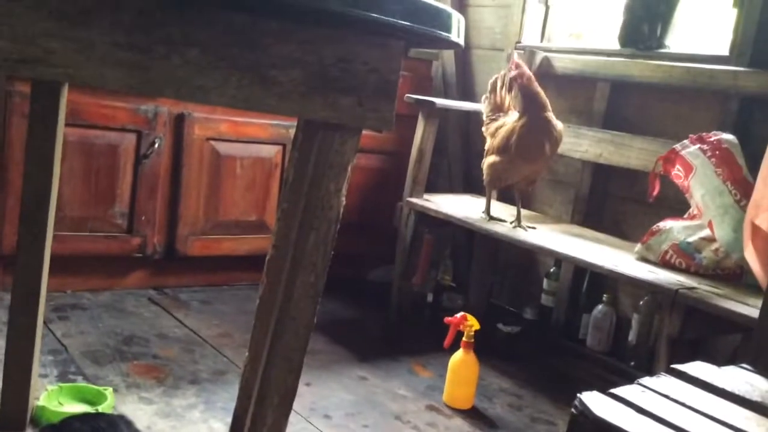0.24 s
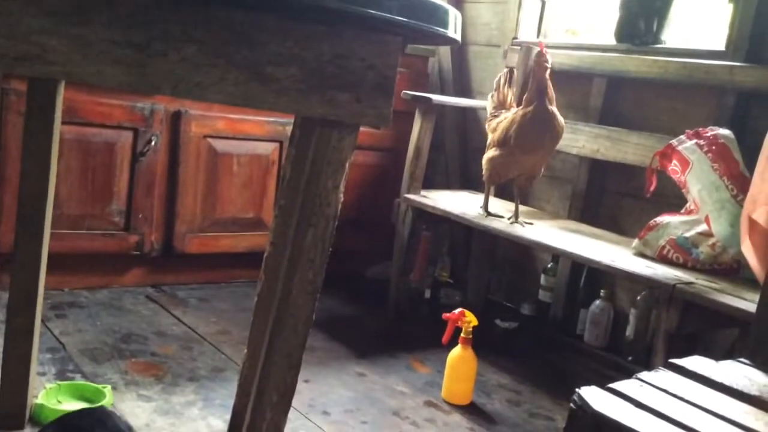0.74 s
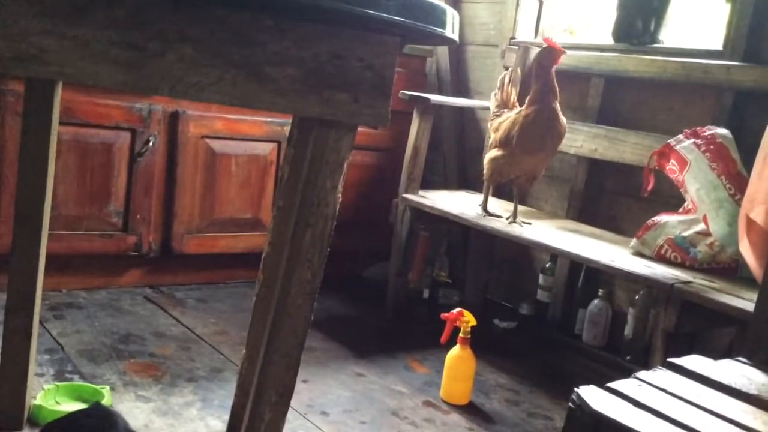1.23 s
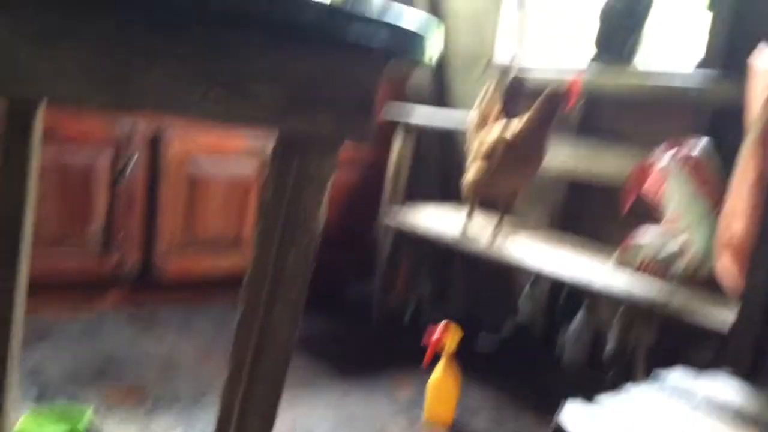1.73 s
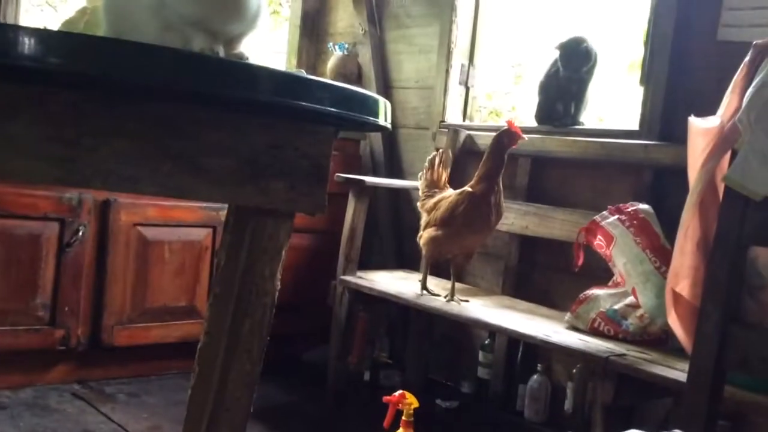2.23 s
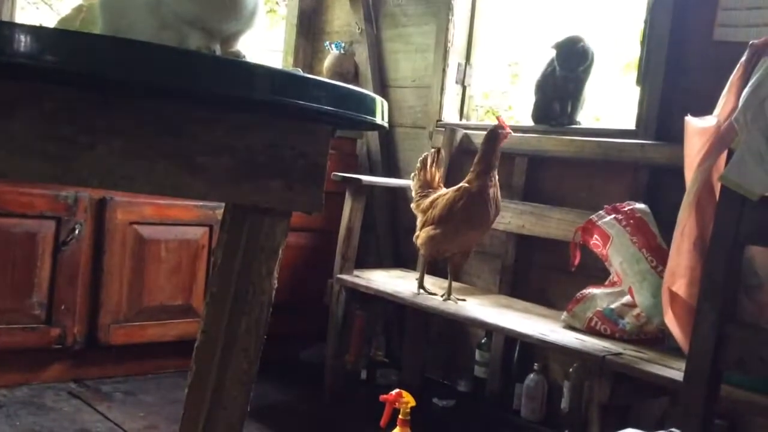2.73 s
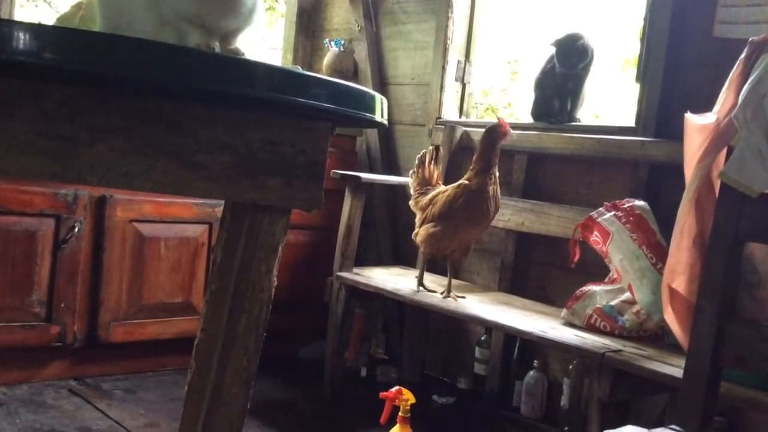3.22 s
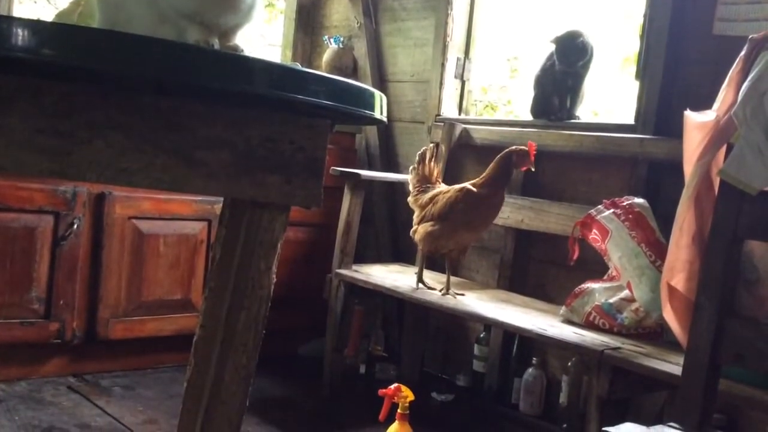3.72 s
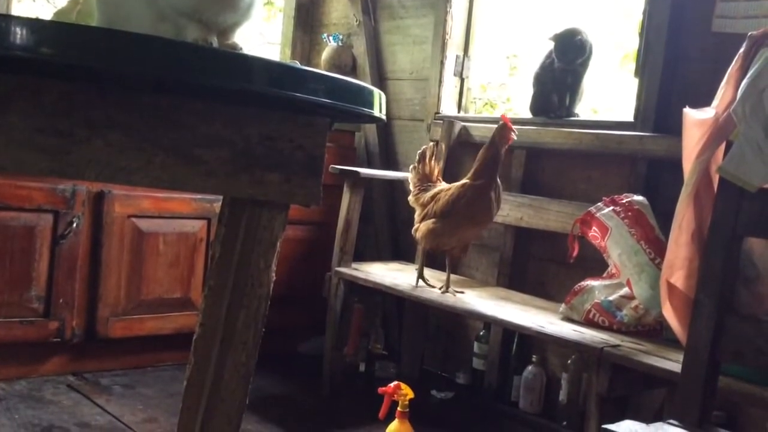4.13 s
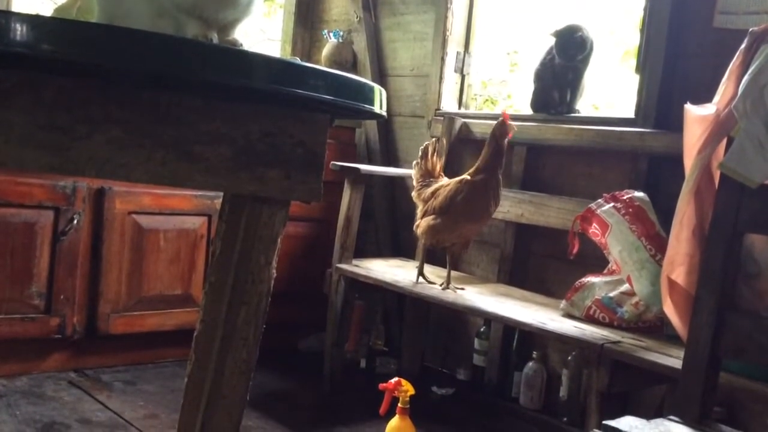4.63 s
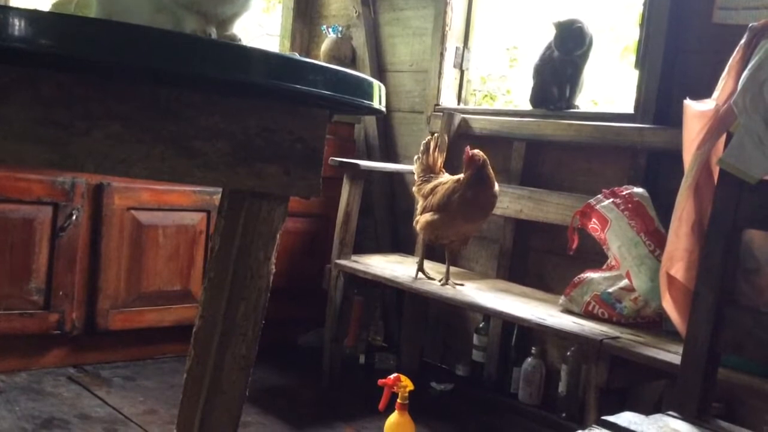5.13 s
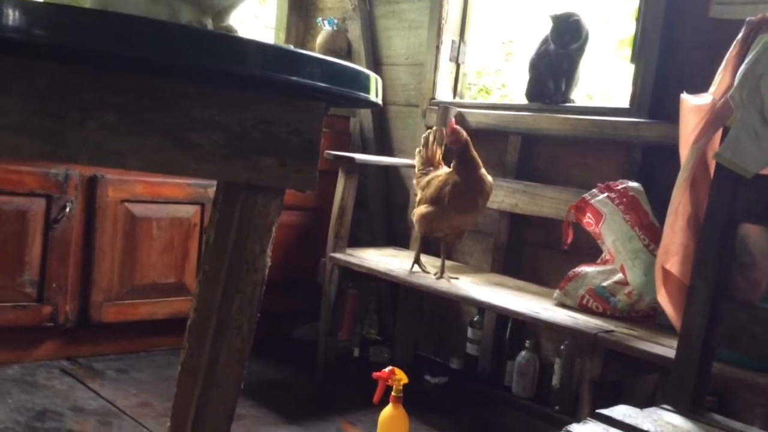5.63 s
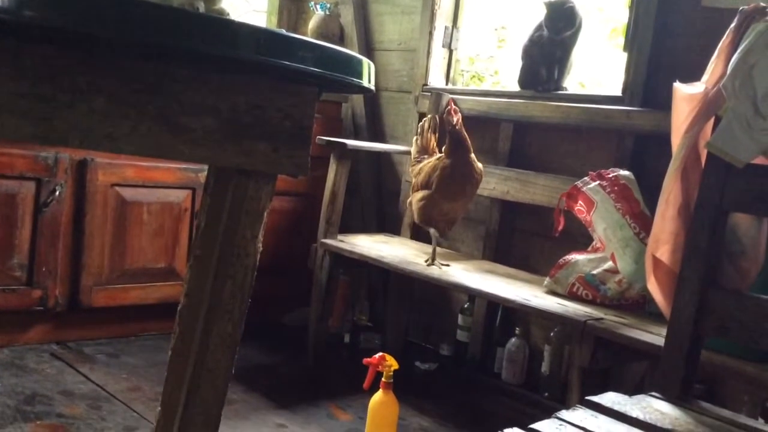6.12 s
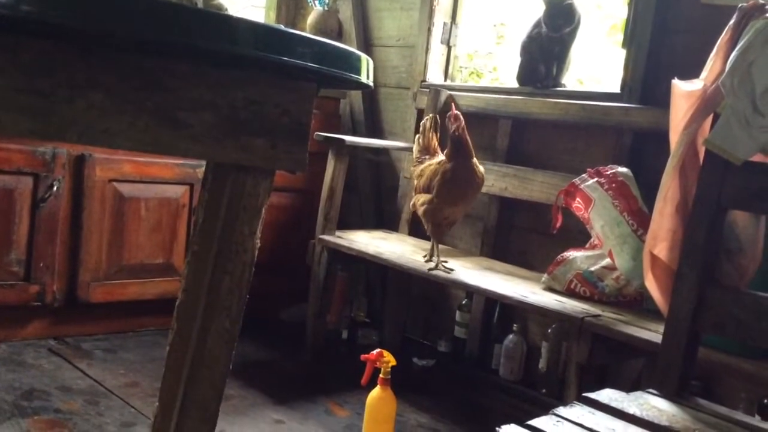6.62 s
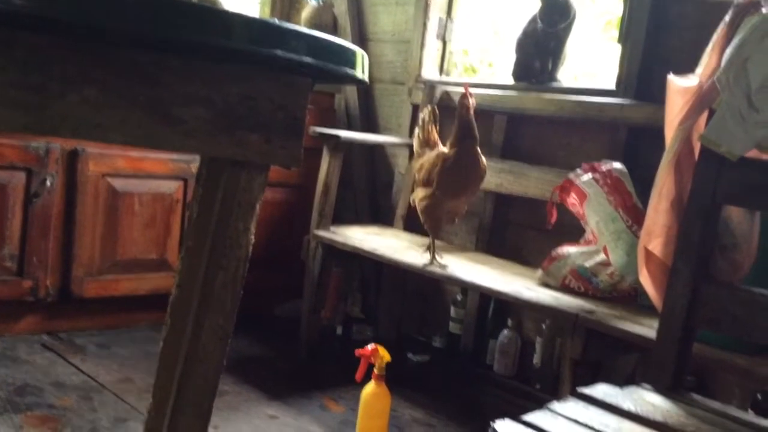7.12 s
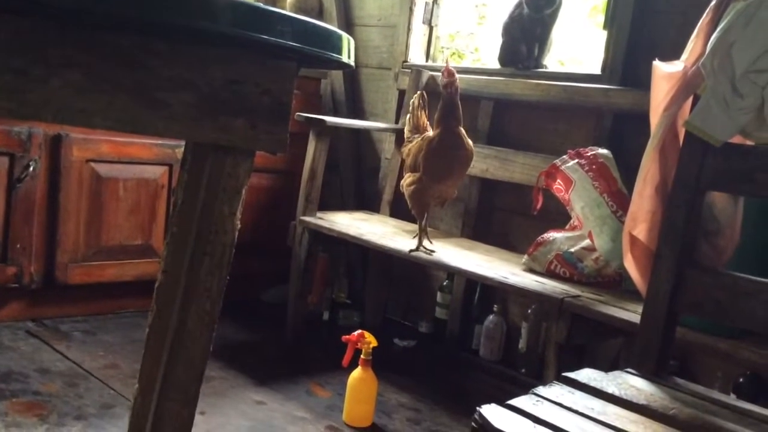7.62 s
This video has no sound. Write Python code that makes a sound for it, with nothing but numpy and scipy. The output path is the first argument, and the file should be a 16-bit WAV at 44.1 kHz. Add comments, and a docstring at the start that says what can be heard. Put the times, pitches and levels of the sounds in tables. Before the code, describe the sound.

In a small kitchen with plank walls, a hen cackles fairly near the microphone. One raspy squawk comes near the start and another about halfway, each followed by a pause and a run of throaty clucks, about four a second, that grows louder. Soft wooden knocks, low thumps, two tiny peeps and a far-off fowl come and go over quiet room hiss and a faint low drone.

```python
"""In a wooden kitchen, a hen on a bench cackles: runs of short clucks, broken by two long squawks.
Her voice box (the syrinx) sends rough pulses through throat and beak; the plank walls answer briefly.
Under her lie the hiss of the quiet room and a faint low drone. Rustles, three soft knocks on wood,
two thin peeps, low thumps in the floor and the far-off call of another fowl come and go."""
import sys
import numpy as np
from scipy import signal
from scipy.fft import rfft, irfft, next_fast_len
from scipy.io import wavfile
from scipy.ndimage import uniform_filter1d, minimum_filter1d, map_coordinates

SR = 44100
rng = np.random.default_rng(int(sys.argv[2]) if len(sys.argv) > 2 else 0)


def store_wav(level_fs):
    """Save 16-bit WAV to argv[1]."""
    pcm = np.round(np.clip(np.atleast_2d(level_fs), -1, 1) * 32767)
    wavfile.write(sys.argv[1], SR, pcm.T.astype(np.int16))


N = 347067
TOP_HZ = 15800

# tone colours of the room's air, a tilt that dulls it, and fine hiss: (frequency [Hz], level [dB])
AIR_COLOUR = [(15, -64.5), (25, -28), (49, -13), (101, -5.5), (246, -13.5), (281, -9), (322, -13),
              (804, -12), (919, -18.5), (1110, -13), (1570, -21.5), (2420, -21), (3530, -19.5),
              (13500, -24), (15500, -48)]
AIR_TILT = [(2000, 2.5), (6000, -5)]
HISS_COLOUR = [(1500, -10), (4000, -6.5), (12000, -2), (15500, -14)]
# swells of the low drone: (centre [s], length [s], level [dB])
DRONE_RISES = [(1.5, 0.57, -66), (5.67, 0.514, -57)]
# clucks: (centre [s], length [s], pitch [Hz], level [dB], beak over throat [dB], roughness [0-1])
HEN_CLUCKS = [(.2, 0.0464, 329, -34.5, 0, 0.68), (0.443, 0.04704, 349, -25.5, -6.5, 0.25),
              (0.878, 0.0625, 299.9, -33, 3.5, 0.82), (2.038, 0.03936, 310.7, -42, -3, 0.85),
              (2.27, 0.0496, 295.8, -40.5, -3.5, 0.75), (2.561, 0.0417, 309.6, -38, -4, 0.76),
              (2.787, 0.0348, 321.3, -31, 1, 0.42), (3.036, 0.0567, 266.1, -38.5, -4.5, 0.39),
              (3.272, 0.0429, 327.2, -31, 4, 0.26), (3.534, 0.04445, 369.4, -31, -0.5, 0.46),
              (3.829, 0.04964, 367.5, -28, 3, 0.45), (4.065, 0.0535, 378.5, -27, 3.5, 0.59),
              (4.474, 0.047, 337.7, -31, 5.5, 0.73), (5.479, 0.055, 298.1, -44.5, 0.5, 0.61),
              (5.735, 0.0416, 334.6, -36.5, -5, 0.73), (5.959, 0.0382, 322.5, -29, 2, 0.63),
              (6.165, .026, 342, -28, -1, 0.43), (6.36, 0.0472, 351.2, -26, 3, 0.39),
              (6.581, 0.04584, 355.3, -26.5, 4, 0.43), (6.807, 0.05, 343.6, -27, 0, 0.4),
              (7.056, 0.04783, 376.9, -26, 5.5, 0.51), (7.288, 0.0504, 380.2, -24.5, 5, .66),
              (7.524, 0.04813, 371.6, -25.5, 7, 0.35), (7.745, 0.0451, 363.9, -24, 5.5, 0.37)]
# a cluck's throat, beak, bright edge and chest: (frequency [Hz], level [dB])
THROAT_COLOUR = [(120, -53), (240, -7), (330, -14), (400, -13.5), (540, -4.5), (690, 5.5), (790, -1),
                 (950, -29), (1300, -56)]
BEAK_COLOUR = [(600, -35), (850, -4), (1000, 2.5), (1110, 5), (1270, -5), (1450, -12.5), (1900, -68.5)]
EDGE_COLOUR = [(1100, -19), (1550, 0.5), (1900, 1.5), (2250, -6.5), (2700, -2), (3200, -4.5), (3800, -4.5),
               (4500, -9), (5200, -14.5), (7000, -20.5), (8600, -15), (12000, -30.5), (15000, -28.5)]
CHEST_COLOUR = [(150, -25), (245, 8), (330, -2), (480, -33)]
# a cluck's high ring: (frequency [times that of the peak], level [dB])
UPPER_PEAK = [(.6, -11), (.85, -19.5), (1, 22), (1.15, -9), (1.6, -32)]
# early echoes from bench and walls: (delay [ms], gain [factor])
WALL_ECHOES = [(2.9, -0.071), (7.3, -0.198), (12.6, 0.198), (18.1, 0.153), (26.4, -0.1404)]
# how long the kitchen rings: (frequency [Hz], time to fade by 60 dB [s])
RING_TIMES = [(200, 0.448), (700, 0.2403), (1150, 0.2758), (3500, 0.315), (12000, 0.286)]
# sound scattered by nearby clutter: (frequency [Hz], level [dB])
CLUTTER_COLOUR = [(500, -18.5), (1200, -12), (3000, -19)]
# squawks: (start [s], length [s], full pressure [s], slackening [s], cry [dB], beak ring [dB],
# its lift as the beak gapes [dB], rasp [dB], harshness fade time [s])
HEN_SQUAWKS = [(.524, 0.3723, 0.136, 0.044, -24.5, -29.5, 18, -37.5, .075),
               (4.146, 0.322, 0.0807, 0.118, -23.5, -29.5, 14.5, -38, 0.0443)]
# the tune of each squawk: (time [s], pitch [Hz])
SQUAWK_TUNES = [
    [(0.535, 552.9), (0.563, 551), (0.575, 533.6), (0.603, 497.2), (0.641, 503.2), (0.661, 487),
     (0.683, 514.6), (0.761, 526.3), (0.86, 519)],
    [(4.155, 536.9), (4.163, 553.7), (4.215, 534.7), (4.225, 525.1), (4.279, 536.9), (4.305, 526.5),
     (4.343, 537.8), (4.351, 523.8), (4.445, 530.5)],
]
# a squawk's cry, breathy rasp, beak ring and reedy top: (frequency [Hz], level [dB])
CRY_COLOUR = [(300, -57.5), (530, -6), (760, -24.5), (1070, -7.5), (1580, -10), (1980, 2), (2200, 3),
              (2480, -28), (3170, -4.5), (3650, -16.5), (4250, -4.5), (5200, -26), (6300, -34.5),
              (15000, -50.5)]
RASP_COLOUR = [(250, -33.5), (700, 6.5), (1300, 7.5), (2100, -11.5), (2450, 5), (3200, 2), (4400, -5.5),
               (5200, 5.5), (6500, 7.5), (8000, 1), (10500, -34.5), (12600, 2.5), (15500, -27)]
RING_COLOUR = [(650, -34.5), (950, -6.5), (1200, -9), (1600, -54.5)]
REED_COLOUR = [(3500, -47), (5900, 2), (8000, -.5), (10500, 1), (12700, -4), (15500, -21)]
# faint rustles: (centre [s], length [s], level [dB])
RUSTLE_SWELLS = [(1.08, 0.415, -67), (1.51, 0.093, -62), (1.84, 0.358, -62)]
# dull knocks on wood: (time [s], level [dB], hardness [dB])
WOOD_KNOCKS = [(1.583, -41.5, -1.5), (4.564, -26, -13), (4.905, -45.5, -28.5)]
# thin, distant peeps: (time [s], pitch [Hz], level [dB])
THIN_PEEPS = [(1.67, 5000, -62), (1.725, 4650, -64.5)]
# low thumps in the floor: (time [s], level [dB])
FLOOR_THUMPS = [(2.029, -44.5), (2.26, -43), (2.621, -49), (3.019, -42.5), (6.322, -46.5)]
# tone colours of the small sounds: (frequency [Hz], level [dB])
RUSTLE_COLOUR = [(700, -4), (2300, -1.5), (3000, -3), (4200, -3), (6500, -14.5), (12000, -15)]
WOOD_COLOUR = [(41, -53), (70, -20), (178, -11.5), (232, -17.5), (290, -6.5), (427, -18.5), (482, -8.5),
               (1280, -31.5), (5420, -35), (9000, -46.5), (11700, -66), (19800, -120)]
CLICK_COLOUR = [(500, -18.5), (1150, -2), (2000, -19.5), (9000, -27.5)]
FLOOR_COLOUR = [(50, -13.5), (110, 8), (170, -1.5), (260, -2), (500, -29)]
FAR_COLOUR = [(550, -14.5), (1150, 0), (1800, -23)]


def amp(db):
    """Turn decibels into a gain."""
    return 10 ** (np.asarray(db) / 20)


def unit(x):
    """Scale x to an average strength (rms) of 1."""
    return x / np.sqrt(np.mean(x ** 2) + 1e-20)


def along(points, hz):
    """Read between (frequency, value) points, with octaves evenly spaced."""
    freqs, values = np.transpose(points)
    return np.interp(np.log(hz + 1), np.log(freqs), values)


def wobble(t, rate):
    """A smooth curve through `rate` random values a second."""
    at = (t - t[0]) * rate
    return map_coordinates(rng.standard_normal(int(at[-1]) + 4), [at])


def colour(x, points):
    """Filter x to give it a tone colour, then scale it to strength 1."""
    size = 2 * next_fast_len(len(x) // 2 + 2048)
    cepstrum = irfft(np.log(amp(along(points, np.fft.rfftfreq(size, 1 / SR)))))
    # this fold makes the filter ring after a sound, never before it
    cepstrum[1:size // 2] *= 2
    cepstrum[size // 2 + 1:] = 0
    return unit(irfft(rfft(x, size) * np.exp(rfft(cepstrum)))[:len(x)])


def swells(rows, t):
    """A gain that rises, holds and falls once for each (centre [s], length [s], level [dB])."""
    return sum(amp(db) * np.exp(-np.abs(2 * (t - s) / length) ** 3) for s, length, db in rows)


def add(track, start, x):
    """Mix x into the track from the given second on."""
    part = track[round(start * SR):][:len(x)]
    part += x[:len(part)]


def room_air(air_db=-58, hiss_db=-66):
    """The quiet room: a soft rush of air and a fine hiss."""
    t = np.arange(N) / SR
    air = amp(air_db + .137 * wobble(t, 13)) * colour(colour(rng.standard_normal(N), AIR_COLOUR), AIR_TILT)
    hiss = amp(hiss_db + wobble(t, 2.5) / 2) * colour(rng.standard_normal(N), HISS_COLOUR)
    return air + hiss


def low_drone(drone_hz=102, rest_db=-69, overtone_db=-14, hum_hz=63, hum_db=-68.5):
    """A wavering drone swells twice above a deeper hum."""
    t = np.arange(N) / SR

    def tone(hz):
        return np.sqrt(2) * np.sin(2 * np.pi * np.cumsum(hz + 3 * wobble(t, 35)) / SR)

    gain = (amp(rest_db) + swells(DRONE_RISES, t)) * amp(.88 * wobble(t, 8))
    drone = gain * (tone(drone_hz) + amp(overtone_db) * tone(2 * drone_hz))
    hum = amp(hum_db + 3.5 * wobble(t, 5)) * tone(hum_hz)
    return drone + hum


def syrinx(t, pitch, jitter, flutter=0, harmonics=44, spread=.22):
    """The voice box: pulses from an unsteady membrane, and a puff of air that escapes once a cycle."""
    phase = 2 * np.pi * np.cumsum(pitch * (1 + jitter * wobble(t, 418.61))) / SR
    pulses = np.zeros(len(t))
    knots = np.arange(t[0], t[-1] + .02, .011)
    for k in range(1, min(harmonics, int(TOP_HZ / pitch.max())) + 1):
        # every overtone flutters on its own, the high ones most
        targets = rng.standard_normal(len(knots)) + 1j * rng.standard_normal(len(knots))
        strength = 1 + flutter * k / (k + 5) * np.interp(t, knots, targets)
        # the overtones of each pulse are spread in time, so the treble sounds less spiky
        pulses += np.real(strength * np.exp(1j * (k * phase + spread * k ** 2)))
    puffs = rng.standard_normal(len(t)) * (1 + .447 * np.cos(phase))
    return unit(pulses), unit(puffs)


def breathy(pulses, puffs, share):
    """Blend voice and breath; share (0-1) is the breath's part of the power."""
    return np.sqrt(1 - share) * pulses + np.sqrt(share) * puffs


def clucks(usual_s=.045, usual_db=-30, lead_in_db=-19, upper_db=-6, upper_range_hz=(2445, 3408)):
    """Each cluck is one push of air: pitch and loudness rise and fall with the pressure."""
    out = np.zeros(N)
    t = np.arange(-SR // 12, SR // 12) / SR
    for centre, length, pitch_hz, db, beak_db, rough in HEN_CLUCKS:
        place = 2 * t / length  # -1 at the start of the cluck, 1 at its end
        push = np.exp(-.9 * np.abs(place) ** np.where(place < 0, 2.9, 2.6))
        # the membranes start slack and low before the beak opens
        lead_in = np.exp(-((t + length / 2 + .00291) / .0175) ** 2)
        slack = .06 * rng.uniform(.19354, 1.7) * np.minimum(place ** 2, 3) * np.where(place < 0, .9, .6)
        wander = .07 * rough * wobble(t, 110)
        pulses, puffs = syrinx(t, pitch_hz * (1 - slack + wander), jitter=.0621 * rough, flutter=1)
        pulses = unit(pulses * amp(7 * rough * wobble(t, 300)))
        voice = breathy(pulses, puffs, rough ** 2)
        throat = (push + amp(lead_in_db) * lead_in) * colour(voice, THROAT_COLOUR)
        beak = amp(beak_db) * push * colour(voice, BEAK_COLOUR)
        body = (throat + beak) / np.hypot(1, amp(beak_db))
        # the chest changes less than the voice, so its share falls in loud clucks
        chest = amp(-23 - .5 * (db - usual_db)) * lead_in * colour(puffs, CHEST_COLOUR)
        # tongue and neck place one high ring anew for every cluck
        upper_hz = rng.uniform(*upper_range_hz)
        buzz = breathy(pulses, puffs, .13 + .5 * rough ** 2)
        upper = colour(buzz, [(upper_hz * ratio, level) for ratio, level in UPPER_PEAK])
        # longer and rougher clucks have more bright edge, louder ones a little less
        edge_db = -14.5 + 209 * (length - usual_s) + 7 * (rough - .5) - .1067 * (db - usual_db)
        edge = amp(edge_db) * push ** .81 * (colour(buzz, EDGE_COLOUR) + amp(upper_db) * upper)
        add(out, centre + t[0], amp(db) * (body + edge + chest))
    return out


def kitchen(x, tail_db=-13, clutter_db=-9, clutter_fade_s=.146, poses=8):
    """Add wall echoes, scatter from clutter, and a short tail that changes as the hen moves her head."""
    t = np.arange(N) / SR
    early = sum(gain * np.interp(t - ms / 1000, t, x, left=0) for ms, gain in WALL_ECHOES)
    hz, age, noise = signal.stft(rng.standard_normal((poses, SR // 2)), SR, nperseg=256)
    late = amp(-60 * age / along(RING_TIMES, hz)[:, None]) * (1 - np.exp(-age / .0497))
    near = amp(-60 * age / clutter_fade_s + along(CLUTTER_COLOUR, hz)[:, None])

    def echo(shape):
        return unit(signal.istft(noise * shape, SR, nperseg=256)[1]) / np.sqrt(SR // 2)

    tails = amp(tail_db) * echo(late) + amp(clutter_db) * echo(1j * near)
    # each pose of the head has its own tail; fade from one to the next
    weights = np.cos(np.pi * (t / 2 - np.arange(poses)[:, None] / poses)) ** 20
    weights /= np.linalg.norm(weights, axis=0)
    return x + early + signal.oaconvolve(weights * x, tails, axes=1)[:, :N].sum(axis=0)


def squawks(attack_s=.005, gape_at_s=.0259, gape_s=.01204, closing_s=.033, release_s=.0285):
    """A squawk bursts out harsh through the gaping beak, holds, then slackens to a reedy note."""
    out = np.zeros(N)
    for squawk, tune in zip(HEN_SQUAWKS, SQUAWK_TUNES):
        start, length, hold_s, slacken_s, cry_db, beak_db, gape_db, rasp_db, harsh_s = squawk
        t = np.arange(round(length * SR)) / SR
        slack = np.clip((t - hold_s) / slacken_s, 0, 1)
        gape = np.exp(-np.abs((t - gape_at_s) / gape_s) ** 3)
        closing = np.exp(-((length - t) / closing_s) ** 2)
        harsh = np.exp(-t / harsh_s)
        # the first burst of pressure pushes the pitch up
        pitch = np.interp(start + t, *np.transpose(tune)) * (1 + .01601 * harsh)
        waver = 1 + .00248 * wobble(t, 55)
        pulses, puffs = syrinx(t, pitch * waver, jitter=.0044 + .0359 * harsh, flutter=.7)
        # strong and weak cycles take turns, and uneven ones fill the gaps between the overtones
        pulses *= 1 + .11 * np.cos(np.pi * np.cumsum(pitch) / SR)
        uneven = pulses * amp((.6 + 6 * harsh) * wobble(t, 600))
        # as the beak closes, the cry fades ahead of the beak's ring
        cry = amp(cry_db - 7.5 * slack - 5.5 * closing) * colour(uneven, CRY_COLOUR)
        ring = amp(beak_db - 4 * slack + gape_db * gape + 3 * closing) * colour(pulses, RING_COLOUR)
        reed = amp(-1) * colour(pulses, REED_COLOUR)
        breath = (.2 + harsh) * colour(puffs, RASP_COLOUR)
        rasp = amp(rasp_db - 4 * slack + 6.5 * gape) * (breath + reed)
        fade = np.clip(t / attack_s, 0, 1) * np.clip((length - t) / release_s, 0, 1)
        add(out, start, fade * (cry + ring + rasp))
    return out


def rustles(flicker_db=3):
    """Faint, scratchy noise swells and flickers."""
    t = np.arange(N) / SR
    scrape = colour(rng.standard_normal(N), RUSTLE_COLOUR)
    return swells(RUSTLE_SWELLS, t) * amp(flicker_db * wobble(t, 45.17)) * scrape


def knocks(thud_fade_s=.2916, click_fade_s=.1):
    """Soft blows set loose boards shuddering, with a short click on top."""
    out = np.zeros(N)
    t = np.arange(SR // 2) / SR
    for time, db, hardness_db in WOOD_KNOCKS:
        rise = 1 - np.exp(-t / .0131)
        thud = colour(rng.standard_normal(len(t)), WOOD_COLOUR) * rise * amp(.5 - 60 * t / thud_fade_s)
        click = colour(rng.standard_normal(len(t)), CLICK_COLOUR) * amp(-8 - 60 * t / click_fade_s)
        # a harder blow clicks more and shakes the boards less
        hard = min(1.53 * amp(hardness_db), 1)
        add(out, time - .004, amp(db) * ((1 - hard) * thud + hard * click))
    return out


def peeps(half_length_s=.015, fall_per_s=2.5):
    """Two short, thin tones slide down in pitch."""
    out = np.zeros(N)
    t = np.arange(-SR // 16, SR // 16) / SR
    for time, hz, db in THIN_PEEPS:
        pitch = hz * (1 - fall_per_s * t + .031 * wobble(t, 302.4))
        tone = np.sqrt(2) * np.sin(2 * np.pi * np.cumsum(pitch) / SR)
        add(out, time + t[0], amp(db) * np.exp(-(t / half_length_s) ** 2) * tone)
    return out


def thumps(rise_s=.00433, fade_s=.186):
    """The floor gives briefly, with nothing but bass."""
    out = np.zeros(N)
    t = np.arange(SR // 3) / SR
    for time, db in FLOOR_THUMPS:
        boom = colour(rng.standard_normal(len(t)), FLOOR_COLOUR)
        add(out, time - .005, amp(db - 60 * t / fade_s) * (1 - np.exp(-t / rise_s)) * boom)
    return out


def far_call(at_s=3.55, length_s=.304, db=-54.5, pitch_hz=586.6, rise_hz_per_s=119.5):
    """Another fowl gives a rising call; from afar one hears mostly the octave above its pitch."""
    out = np.zeros(N)
    t = np.arange(-SR // 4, SR // 4) / SR
    pulses, _ = syrinx(t, pitch_hz + rise_hz_per_s * t, jitter=.0464, harmonics=4)
    add(out, at_s + t[0], swells([(.0036, length_s, db)], t) * colour(pulses, FAR_COLOUR))
    return out


def scene():
    """The hen and the small sounds echo in the kitchen, over floor thumps, air and drone."""
    sounds = clucks() + squawks() + knocks() + far_call() + rustles() + peeps()
    return (kitchen(sounds) + thumps() + room_air() + low_drone())[None]


def record(dry, ceiling_db=-8):
    """Turn the level down around the loudest peaks and cut all treble above TOP_HZ."""
    needed = np.minimum(1, amp(ceiling_db) / (np.abs(dry) + 1e-9))
    gain = uniform_filter1d(minimum_filter1d(needed, size=440), size=440)
    size = next_fast_len(N + 4096)
    kept = np.fft.rfftfreq(size, 1 / SR) < TOP_HZ
    return irfft(rfft(dry * gain, size) * kept, size)[..., :N]


dry = scene()
out = record(dry)
store_wav(out)
```